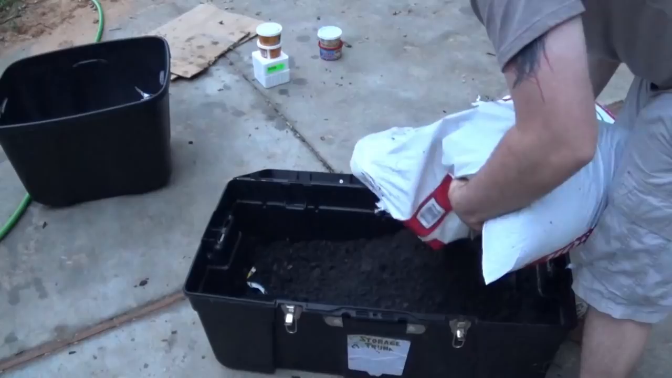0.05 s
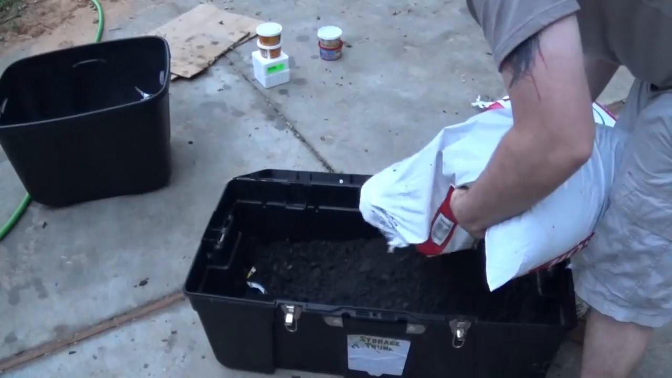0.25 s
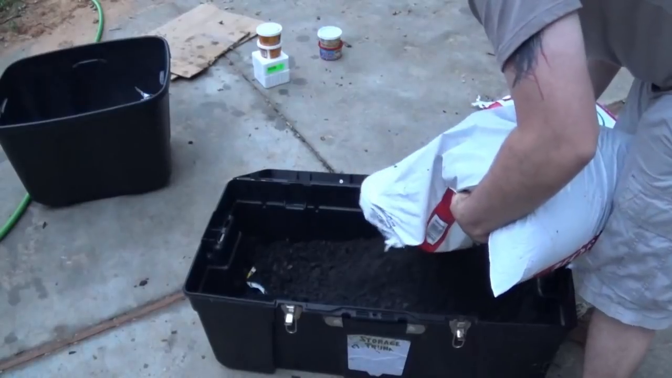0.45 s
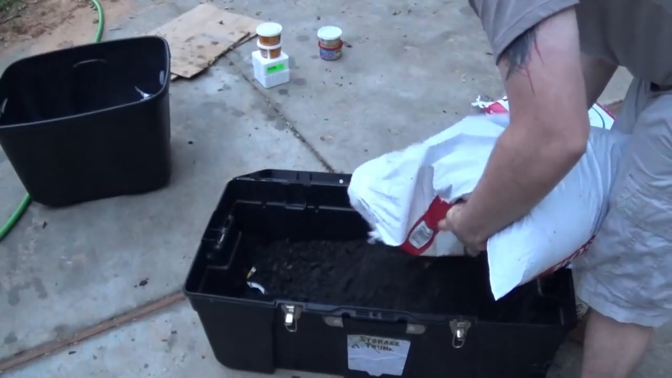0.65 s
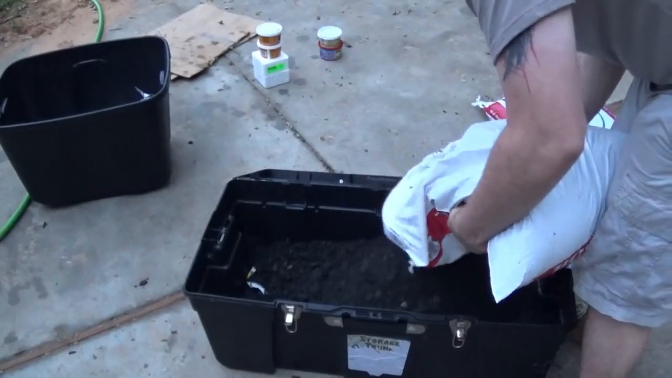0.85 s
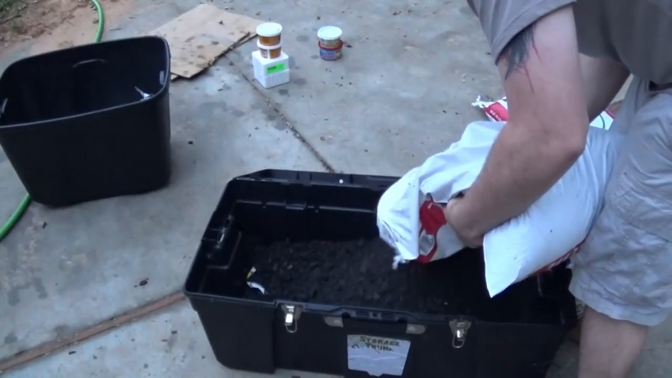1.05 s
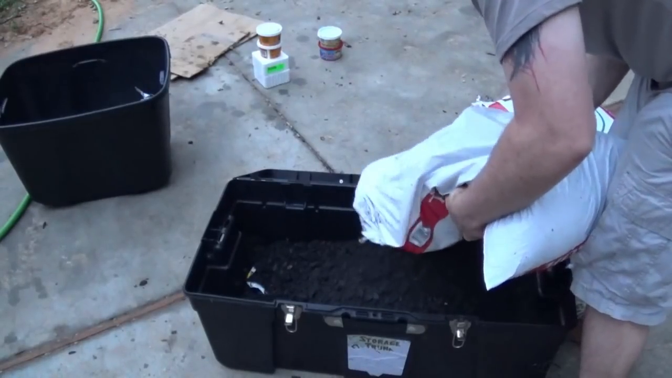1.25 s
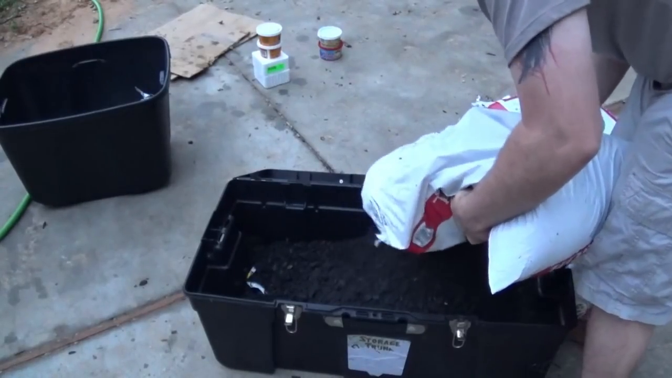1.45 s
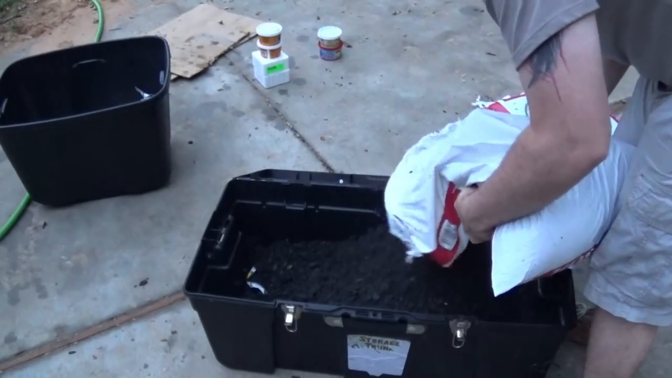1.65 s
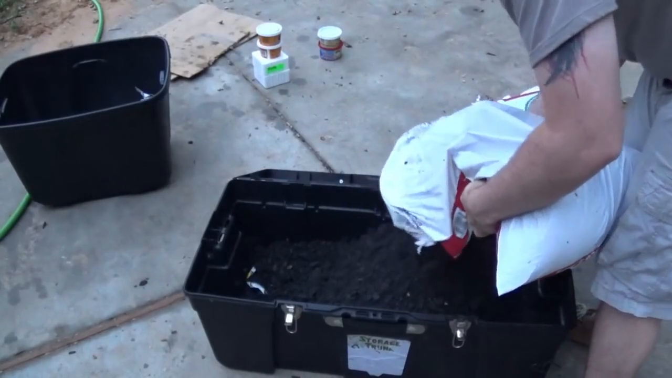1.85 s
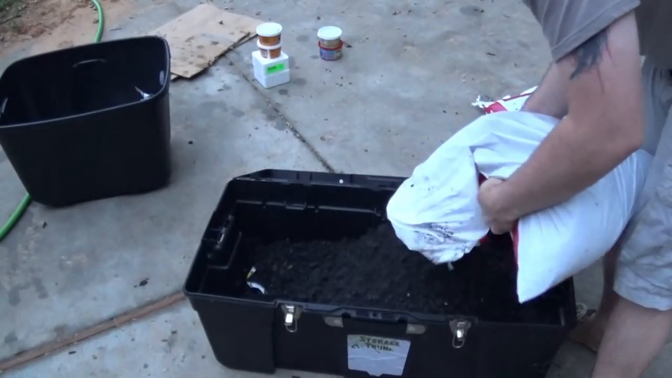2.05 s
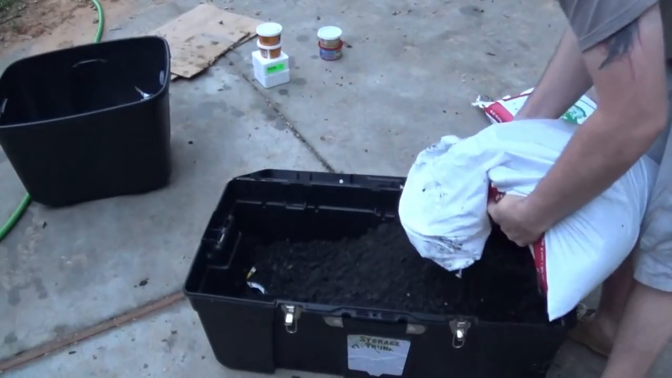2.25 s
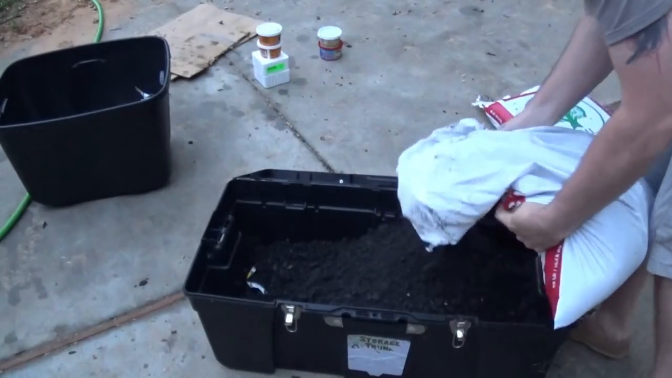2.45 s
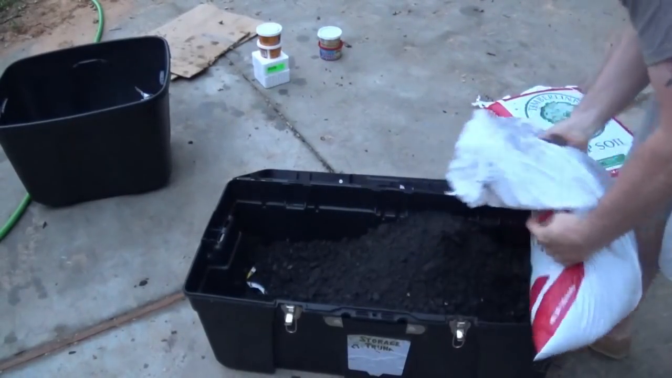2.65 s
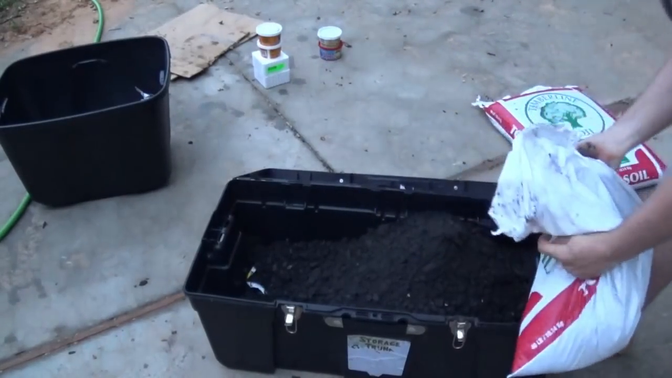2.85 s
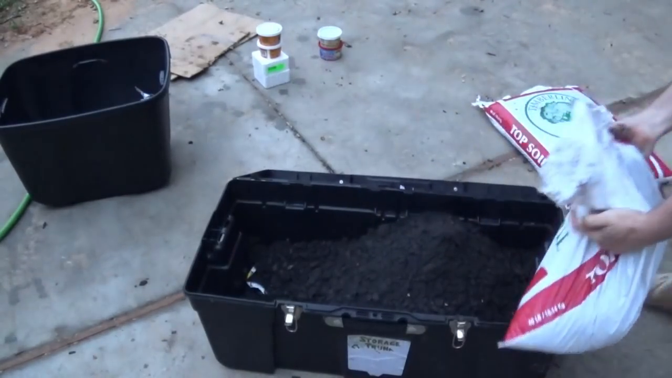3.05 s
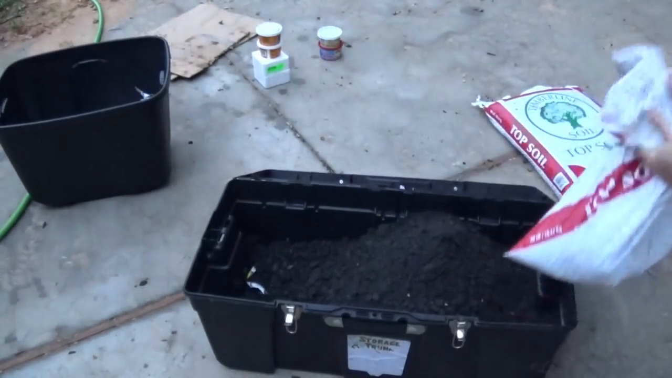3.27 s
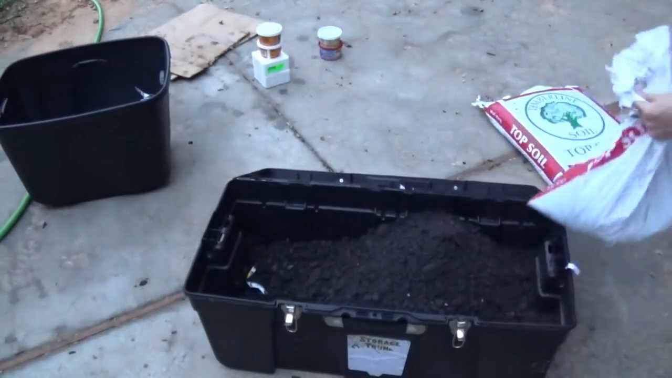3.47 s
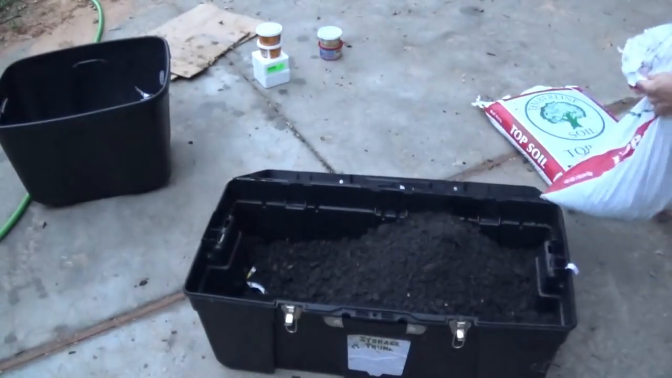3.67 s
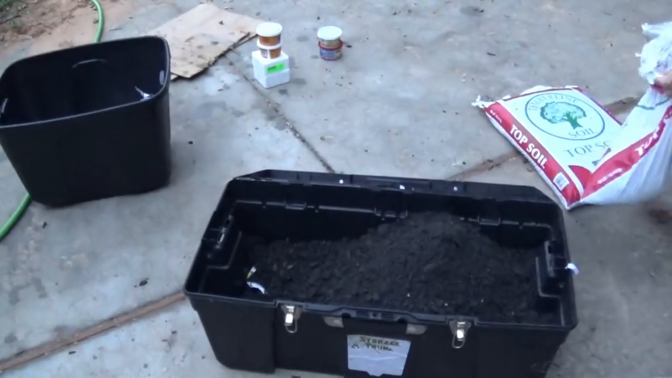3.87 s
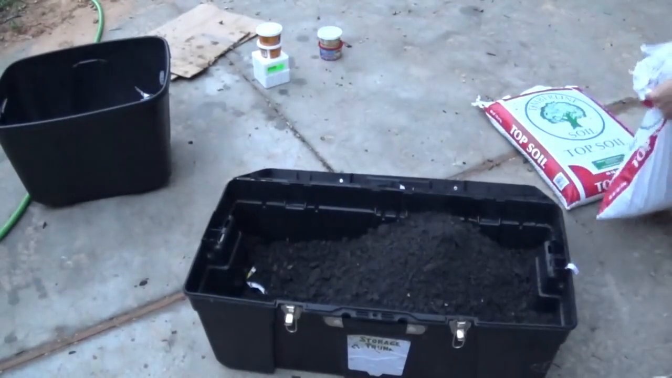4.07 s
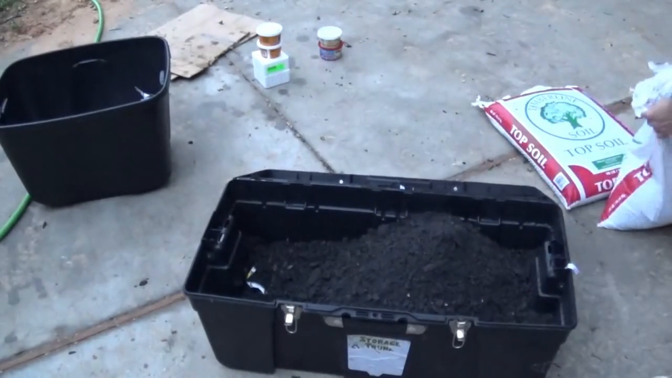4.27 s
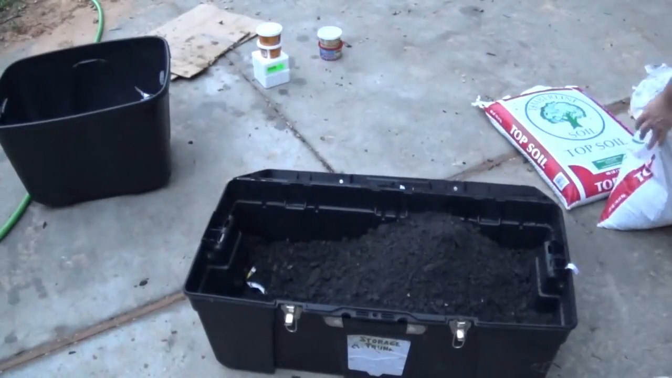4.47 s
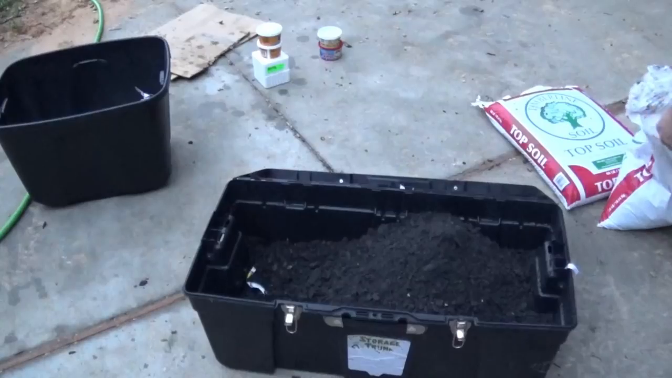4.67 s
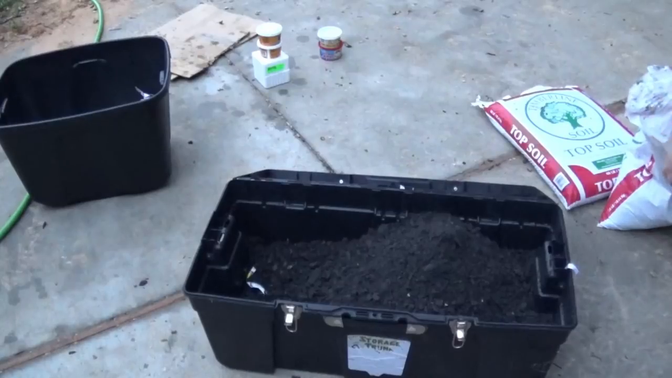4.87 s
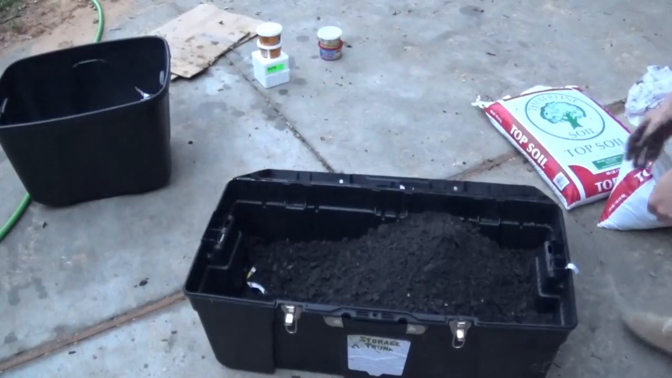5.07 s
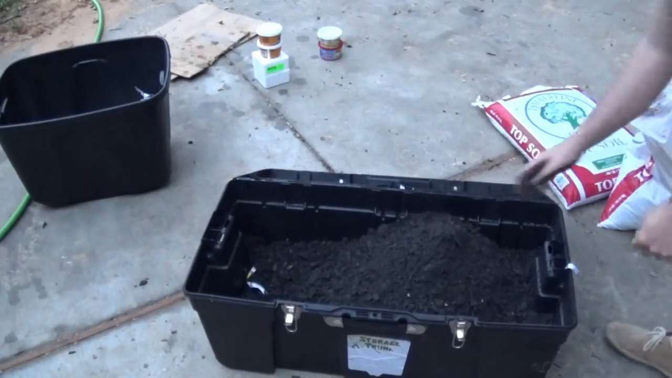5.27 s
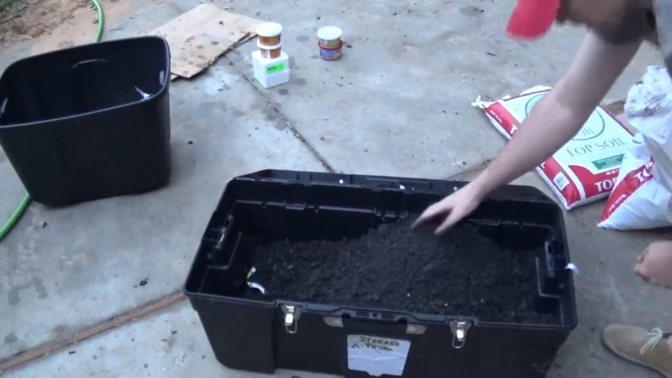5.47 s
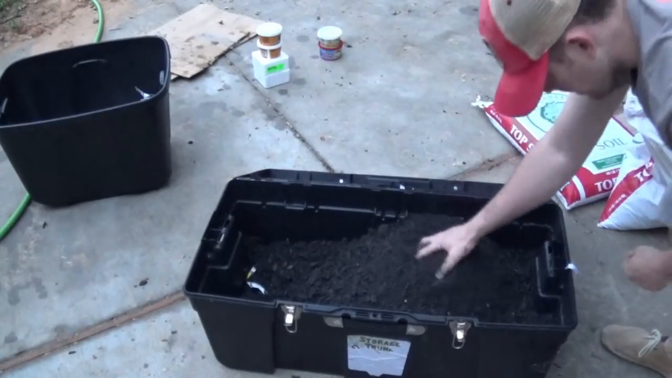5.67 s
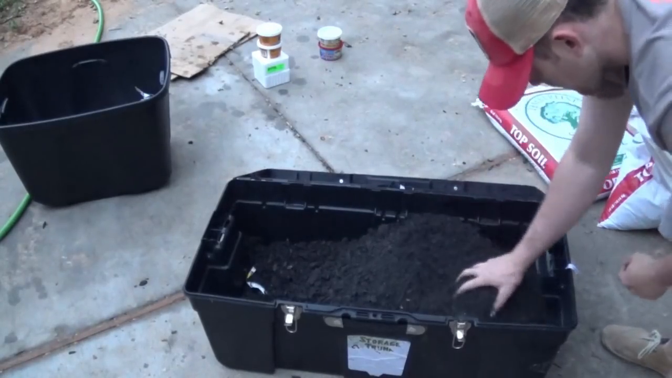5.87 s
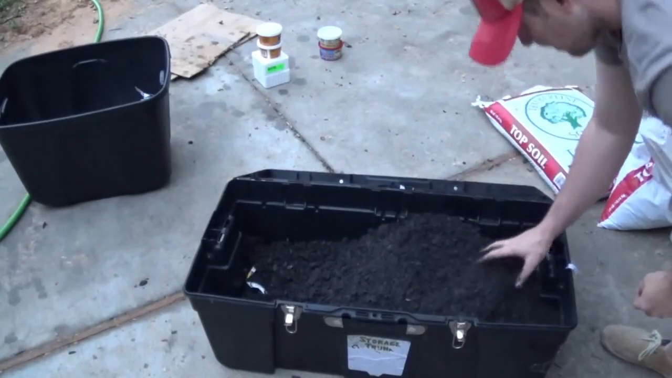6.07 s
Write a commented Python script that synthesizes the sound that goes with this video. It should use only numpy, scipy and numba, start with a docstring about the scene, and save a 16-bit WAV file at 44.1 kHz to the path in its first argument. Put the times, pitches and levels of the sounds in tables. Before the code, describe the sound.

Close, bright stereo sound outdoors: crinkling film and sliding soil, with scattered sharp pops, one early falling bird whistle and a tiny latch rattle. The crackle grows dense and loudest near the middle, drifts slightly right as the sack is carried off, and ends in a few crisp snaps. Near-silence follows, then small gritty strokes over soft air and thin insect tones.

```python
"""Plastic film crackles in tiny creases and louder snaps as a sack of soil is tipped into a plastic chest,
lifted, set down and the soil raked by hand on a concrete yard: struck damped sines, noise and filtered pops.
Soft thuds and a latch clink are damped sines; a bird's one whistle is a falling sine with noise echoes.
Behind it lie smooth far air and insects, made of broad and narrow bands of noise."""
import sys
import numpy as np
from scipy import signal
from scipy.fft import rfft, irfft
from scipy.io import wavfile
from scipy.ndimage import uniform_filter1d
from numba import njit

SR = 44100
rng = np.random.default_rng(int(sys.argv[2]) if len(sys.argv) > 2 else 0)


def to_wav(sig):
    """Store sig (one row per channel, or 1-D mono) as 16-bit WAV at the path in sys.argv[1].

    Samples outside -1..1 are clipped; the rate is SR.
    """
    pcm = np.clip(np.atleast_2d(sig), -1, 1) * 32767
    pcm = np.round(pcm).astype(np.int16)
    wavfile.write(sys.argv[1], SR, pcm.T)  # frames by channels


N = 269892


# Colour of the rustling film: f/Hz, relative level/dB per Hz
FILM_COLOUR = [(18, -60), (30, -43), (227, -12.5), (263, -10.5), (623, -2), (778, -3.5), (1590, -1),
               (2360, -5), (2950, -2.5), (6490, -6), (8520, -1), (9640, -1), (10900, -7), (14200, -57),
               (22000, -120)]


def rustle(gains):
    """Swarms of creases over the hiss of sliding soil and film, as busy as the hands."""
    swarm = undb(2.0) * creases(count=4500, scatter_db=3.0, spread_s=.001, cycles=9.9, wander_db=2.5)
    hiss = wide_noise()
    parts = thirds(colour(swarm + hiss, FILM_COLOUR))
    # the heavy sack shifts air and shakes the ground: a faint rumble
    lowpass = signal.butter(2, 110, fs=SR, output="sos")
    rumble = signal.sosfilt(lowpass, wide_noise(spread=2.5))
    mix = sum(gain * level(part, 0) for gain, part in zip(gains, parts))
    mix = mix + gains[1] * level(rumble, -35.0)
    return mix * sides(place_db(np.arange(N) / SR))


# Underlying rustle of the handled sack and sliding soil, swelling and fading:
# t/s, middle level/dB, dull level/dB re middle, crisp level/dB re middle
UNDERLYING_RUSTLE = [(0, -51, -2.5, -1), (0.3, -56.5, 1, 0.5), (0.63, -53.5, 2, 4), (0.78, -45, -1, 3.5),
                     (0.95, -45, -3, 0.5), (1.08, -51.5, -0.5, 3), (1.5, -52.5, 0, 3.5),
                     (1.97, -55, 5, 3.5), (2.05, -42.5, -0.5, -0.5), (2.4, -49, -3.5, 4),
                     (2.68, -45.5, 1.5, 5.5), (2.85, -44, -6, 1), (3.17, -48.5, -2, 1.5),
                     (3.33, -51, -3, -4), (3.6, -48, 3.5, 2), (3.75, -55.5, 4.5, -6), (4.06, -54, 0.5, 0.5),
                     (4.3, -52, -1.5, 1), (4.56, -55.5, 1, -7), (4.69, -65, -1, -1), (4.9, -57.5, -4, -2),
                     (4.96, -65, 1.5, -2), (5.45, -81, -13, -11), (5.6, -65, 3, 2.5), (5.82, -73, -1, 3),
                     (6.12, -62, -10, -11)]
# Tugs at the sack and strokes through the soil:
# t/s, peak middle level/dB, rise/s, fall/s (each per SWING_DB), dull level/dB re middle, crisp level/dB re middle
TUGS = [(.156, -45, 0.041, .1, 0.5, 1.5), (.314, -49, 0.041, 0.072, 2.5, 3.5),
        (.474, -46.5, 0.082, 0.022, 0, 0.5), (.596, -49, 0.046, 0.024, -15, -5),
        (.67, -53.5, 0.019, .04, 8, -5), (.885, -48, 0.037, 0.039, 6, 1),
        (.99, -47, 0.046, 0.025, -0.5, -1), (1.174, -52, .1, .2, 2.5, 3.5), (1.3, -56, 0.055, .05, 8, -3),
        (1.619, -46, 0.038, 0.092, -0.5, 2), (1.904, -48.5, 0.1, 0.071, -1.5, -7),
        (2.469, -42, 0.17, 0.027, -1.5, -.5), (2.528, -46, 0.035, .07, 4.5, 2),
        (2.621, -42, 0.065, 0.03, 2, 7.5), (2.744, -31.5, 0.064, 0.037, -1.5, 1.5),
        (2.905, -45, .03, 0.065, 2, -4), (3.226, -40.5, 0.03, 0.043, -2.5, 0),
        (3.351, -37.5, 0.076, 0.07, -4, -2.5), (3.456, -38.5, 0.013, 0.22, -4.5, -2.5),
        (3.547, -41, 0.12, 0.054, 1.5, 5), (3.702, -41.5, 0.061, 0.027, -9, 4.5),
        (3.869, -50, 0.16, 0.13, -4, 3.5), (4.022, -58, 0.039, 0.048, -12, -9),
        (4.197, -30, 0.034, 0.038, -1, -2), (4.519, -52, 0.068, 0.06, -15, -1),
        (4.595, -55.5, 0.033, 0.058, -1, -8), (4.932, -52.5, 0.018, 0.0087, 3, -3),
        (5.188, -53, .01, 0.028, 6, 2), (5.246, -47.5, 0.018, 0.063, -4, -3.5),
        (5.347, -48.5, 0.023, 0.025, 4, 5), (5.396, -59, .03, 0.071, -3, -17),
        (5.52, -54, 0.034, 0.035, -1, 0.5), (5.845, -59, 0.015, 0.16, 6.5, 2),
        (5.902, -57, 0.052, 0.1, 7, 5), (6.06, -59, 0.076, 0.1, -19, -13)]
SWING_DB = 10


def handling():
    """Dull, middle and crisp rustle gains: the power of the underlying rustle plus a swell for every tug."""
    t = np.arange(N) / SR
    s, *columns = np.transpose(UNDERLYING_RUSTLE)
    db, dull_db, crisp_db = (np.interp(t, s, c) for c in columns)
    power = undb([db + dull_db, db, db + crisp_db]) ** 2
    for at, peak_db, rise, fall, dull_db, crisp_db in TUGS:
        # follow each swell down to four swings below its peak
        near = slice(max(int((at - 4 * rise) * SR), 0), int((at + 4 * fall) * SR))
        distance = np.maximum((at - t[near]) / rise, (t[near] - at) / fall)
        swell_db = peak_db - SWING_DB * distance
        power[:, near] += undb(swell_db + np.array([[dull_db], [0], [crisp_db]])) ** 2
    return np.sqrt(power)


def creases(count, scatter_db, spread_s, cycles, wander_db):
    """Each tiny crease rings six patches of film, each at its own pitch; big creases are rare."""
    u = rng.random((count, 6, 4))
    delay = -spread_s * SR * np.log(1 - u[:, :, 1])
    start = u[:, :1, 0] * N + delay
    hz = 150 + 11500 * u[:, :, 2]
    size = undb(-scatter_db * np.log(1 - .99 * u[:, :1, 3]))  # one size for all patches of a crease
    strike = size * np.sign(u[:, :, 3] - .5) * np.sqrt(hz / 4000 + 0.07)
    pan_db = wander_db * rng.standard_normal(hz.shape)
    gain = (strike * sides(pan_db)).reshape(2, -1)
    t60 = (cycles / hz).ravel()
    return level(ring(start.ravel().astype(np.int64), hz.ravel(), t60, gain, N), 0)


# Loud snaps of the film:
# t/s, peak level/dB, dull part gain/dB, fold f/Hz, crisp part gain/dB
SNAPS = [(0.314, -15.5, -14, 2080, -1), (0.5809, -24.5, -6, 820, -3), (0.753, -28, -17.5, 760, 19),
         (0.801, -19, -3, 2200, 23), (0.8045, -20, -3, 2000, 20), (1.168, -13.5, 15, 1300, 22),
         (1.6217, -26.5, -0.5, 2050, -4.5), (1.846, -21, -8, 1130, -27), (1.8673, -19.5, -8, 1840, 23),
         (1.8946, -16.5, 3, 2080, 5), (1.923, -11.5, -14, 1850, -6), (2.0087, -16, -1, 1430, -0.5),
         (2.0842, -14, -3, 1800, 13), (2.101, -16, 2, 1930, 8), (2.1579, -13, -8, 2200, 10),
         (2.1749, -13.5, 8, 950, 8), (2.2839, -14, 4.5, 1030, 5), (2.4017, -15.5, -4, 580, 14),
         (2.4354, -9, 7.5, 1150, 2.5), (2.4757, -15, 6, 1120, -5), (2.5182, -12.5, -6, 1370, -5),
         (2.555, -12, 1, 1650, 11), (2.597, -13.5, 11, 1120, 5), (2.623, -13, -10, 2020, 5),
         (2.6313, -11.5, 8, 1500, -3), (2.7407, -2.5, -0.5, 1960, 2), (2.75, 1.5, -3, 636, 5),
         (2.7925, -11, -7, 1740, 11), (2.8235, -14, -1, 1650, 8), (2.886, -19, 0, 1770, -6),
         (2.909, -21, 8, 1500, -8), (2.978, -20.5, 4, 1540, -5), (3.1022, -16.5, 10, 1110, 11.5),
         (3.1686, -20.5, 9, 600, 10), (3.2142, -10, -8, 870, 5), (3.233, -8, -9, 1080, 8),
         (3.314, -11, 7, 1660, 10.5), (3.3372, -25.5, 11, 1420, -9), (3.352, -18, 8, 1300, -13),
         (3.3818, -14.5, -2, 564, -3), (3.4076, -10.5, -11, 2200, 0), (3.4182, -7.5, -6, 1670, 0),
         (3.446, -14, -13, 1640, -4), (3.6108, -15, -4, 1720, -4), (3.6491, -8.5, -6, 1530, 4),
         (3.7042, -13, 10, 1010, 12), (3.7298, -12, -7, 1550, 14), (3.7684, -19, 5, 1130, 11),
         (3.8168, -13.5, 4, 567, 6), (3.8534, -23, -23.5, 660, 21), (3.9215, -18.5, -9, 1490, 4),
         (4.0138, -19, -6, 1650, 9), (4.0312, -24, 1, 1780, -14), (4.1917, -6, 1, 765, 5),
         (4.226, -16, -2, 2020, 12), (4.271, -20, -13, 1060, -5), (4.5066, -8.5, -6, 1420, -2.5),
         (4.551, -24, -3, 1110, -17), (4.584, -27.5, 2, 1080, 0), (4.5933, -22.5, 7, 1550, -5),
         (4.793, -35, -6, 1700, -4), (4.8108, -33, -2, 1660, -6), (4.8356, -23, 0.5, 1370, -8),
         (4.8547, -31, 2, 1160, 4), (4.9032, -29.5, 2, 2000, -9), (4.92, -29, 8.5, 1160, -5),
         (4.9925, -25, -14, 1960, 8), (5.2464, -24.5, 6.5, 1220, -20), (5.3073, -26, -16, 2200, -3),
         (5.3875, -18.5, -2, 2370, -9), (5.6323, -31.5, -8, 2090, 16), (5.8336, -30, -4, 1830, -10),
         (5.857, -34, 15, 1830, -14), (5.867, -27.5, 27, 594, 18), (5.9016, -28.5, 6, 650, -19),
         (5.9174, -31, 24, 650, 12), (5.9589, -18, -1, 1570, -5), (6.011, -27, -13, 1990, -9),
         (6.0291, -23, -3, 2000, -13), (6.0474, -23.5, -4, 1770, -16), (6.063, -25.5, -1, 1940, -17),
         (6.0707, -27.5, 6, 2060, 2), (6.102, -33, 1, 1920, -17)]


def snaps(rows, echo_s=0.001311, low_hz=500, high_hz=11000, sharpness=2.24):
    """A pop, its bounce off the concrete and a short film shiver; the fold rings dully at its own pitch."""
    lead, t = 64, np.arange(1000) / SR  # the lead, in samples, leaves room for the two-way filters
    echo, tail_db, tail_t60 = .55, -18, .016
    out = np.zeros((2, N + lead + len(t)))
    band = signal.butter(2, (low_hz, high_hz), "band", fs=SR, output="sos")
    for s, peak_db, dull_db, fold_hz, crisp_db in rows:
        mid, side = rng.standard_normal((2, len(t)))
        shiver = mid + 0.26 * side * np.array([[1], [-1]])
        pop = undb(tail_db) * shiver * undb(-60 * t / tail_t60)
        pop[:, 0] += 1
        pop[:, int(echo_s * SR * rng.uniform(.7, 1.3))] += echo
        pop = np.pad(signal.sosfilt(band, pop), ((0, 0), (lead, 0)))
        dull, middle, crisp = thirds(pop)
        fold = signal.lfilter(*signal.iirpeak(fold_hz, sharpness, SR), dull)
        fold *= np.linalg.norm(dull) / np.linalg.norm(fold)
        pop = undb(dull_db) * fold + middle + undb(crisp_db) * crisp
        pop *= undb(peak_db) / np.abs(pop).max()
        pan_db = place_db(s) + 2 * rng.standard_normal()  # each snap wanders by 2 dB
        i = int(s * SR)
        out[:, i:i + lead + len(t)] += pop * sides(pan_db)[:, None]
    return out[:, lead:N + lead]


def small_snaps(gain, count):
    """Rows like SNAPS, at chance moments, standing out above the rustle and rising and falling with it."""
    above_rustle_db, scatter_db, colour_spread_db = 18.5, 2.5, 6.5
    u, g = rng.random((count, 2)), rng.standard_normal((count, 3))
    at = u[:, 0] * N
    rustle_db = 20 * np.log10(gain[at.astype(int)])
    peak_db = rustle_db + above_rustle_db + scatter_db * g[:, 0]
    dull_db, crisp_db = colour_spread_db * g[:, 1], colour_spread_db * g[:, 2]
    fold_hz = 600 + 1600 * u[:, 1]
    return np.transpose([at / SR, peak_db, dull_db, fold_hz, crisp_db])


# The sack is carried off to the right: t/s, left minus right level/dB
PLACE = [(0, -0.5), (2, -0.5), (3.2, -2.5), (6.12, -2)]


def place_db(s):
    """Left-right level difference that places the sack at a given time."""
    return np.interp(s, *np.transpose(PLACE))


# Clods and the sack landing: t/s, strike level/dB before the softening low-pass, f/Hz
THUDS = [(0.664, -47, 180), (0.859, -61, 285), (1.256, -55, 204), (2.387, -44, 251), (2.684, -57, 236),
         (2.734, -59, 199), (3.028, -51, 299), (3.09, -48, 263), (3.478, -28.5, 463), (3.598, -38, 221),
         (4.181, -43, 198), (4.187, -50.5, 96), (5.884, -48, 272)]


def thuds(cycles=14.0, soft_hz=500):
    """Soft blows on chest and ground: damped low cycles, rounded by the slow contact."""
    s, db, hz = np.transpose(THUDS)
    blows = ring((s * SR).astype(np.int64), hz, cycles / hz, undb([db, db]), N)
    return signal.sosfilt(signal.butter(2, soft_hz, fs=SR, output="sos"), blows)


# Blows on the latch of the chest: t/s, level/dB
CLINKS = [(.966, -42), (.975, -39), (.983, -36.5)]
# Ringing modes of the latch: f/Hz, level/dB re blow, t60/s
LATCH_MODES = [(2062, -1, 0.35), (2966, 1.5, 0.19), (3120, -7, .08), (3230, -5, 0.13), (3817, -20, .2),
               (4440, -11, 0.28)]


def latch():
    """The metal latch rattles: every blow rings all its modes as damped sines."""
    hz, db, t60 = np.tile(np.transpose(LATCH_MODES), len(CLINKS))
    s, blow_db = np.repeat(np.transpose(CLINKS), len(LATCH_MODES), axis=1)
    return ring((s * SR).astype(np.int64), hz, t60, undb([db + blow_db] * 2), N)


def bird(echo_db=2.0, echo_t60=.3, waver=.022):
    """A slightly hoarse whistle, sliding down ever more slowly, with echoes from walls and trees."""
    start_s, start_db, fade_db_per_s = .135, -47.5, 9
    high_hz, low_hz, slide_s = 8110, 3593, .38
    attack_s, hold_s, release_s = 0.02, .28, 0.094
    t = np.arange(N) / SR
    age = np.maximum(t - start_s, 0)
    hz = low_hz + (high_hz - low_hz) * np.maximum(1 - age / slide_s, 0) ** 2
    envelope = np.interp(age, np.cumsum([0, attack_s, hold_s, release_s]), [0, 1, 1, 0])
    loudness = envelope * undb(start_db - fade_db_per_s * age)
    shake = level(uniform_filter1d(rng.standard_normal(N), 150), 0)  # makes the pitch hoarse
    phase = 2 * np.pi * np.cumsum(hz * (1 + waver * shake)) / SR
    tone = np.sqrt(2) * loudness * np.sin(phase)
    echoes = rng.standard_normal((2, SR // 3)) * undb(-60 * t[:SR // 3] / echo_t60)
    echoes *= undb(echo_db) / np.sqrt(np.sum(echoes[0] ** 2))
    return tone + signal.fftconvolve(tone[None], echoes, axes=1)[:, :N]


# Colour of the far air: f/Hz, relative level/dB per Hz
AIR_COLOUR = [(30, -22), (100, -4), (350, -1.5), (1000, -7), (2500, -5.5), (4500, -12), (6500, -19.5),
              (8000, 1), (11000, -21)]
# Insect bands: f/Hz, width/Hz, level/dB before the swell
INSECTS = [(3220, 65, -85), (5270, 36, -78), (5730, 150, -67.5), (7740, 80, -70.5)]


def yard():
    """Smooth far air as coloured noise, and an insect chorus as narrow noise bands."""
    out = level(colour(wide_noise(spread=4.8), AIR_COLOUR), -63)
    for hz, width, db in INSECTS:
        band = signal.butter(2, (hz - width / 2, hz + width / 2), "band", fs=SR, output="sos")
        swell = level(uniform_filter1d(rng.standard_normal(N), SR // 4), 0)  # each band swells on its own
        chorus = level(signal.sosfilt(band, wide_noise(spread=2.8)), db)
        out = out + undb(2.4 * swell) * chorus
    return out


# Likeness of the two channels: f/Hz, correlation before the spread exponent
LIKENESS = [(30, 0.74), (100, 1), (1000, 0.61), (3000, 0.61), (10000, 0.91)]


def wide_noise(spread=0.77):
    """White noise in two channels from mid and side; a larger spread makes them less alike."""
    c = np.clip(along(LIKENESS, np.arange(N // 2 + 1) * SR / N) ** spread, 0, 1)
    mid, side = rfft(rng.standard_normal((2, N)))
    return irfft(mid * np.sqrt(1 + c) + side * np.sqrt(1 - c) * np.array([[1], [-1]]), N)


@njit
def ring(start, hz, t60, gain, length):
    """Damped sines, each struck once at a start sample and dying by 60 dB in t60 seconds."""
    out = np.zeros((2, length))
    for k in range(len(start)):
        # one turn and decay per sample
        p = np.exp(2j * np.pi * hz[k] / SR - np.log(1000) / (t60[k] * SR))
        z = 1 + 0j
        for i in range(start[k], min(start[k] + int(t60[k] * SR) + 1, length)):
            out[0, i] += gain[0, k] * z.real
            out[1, i] += gain[1, k] * z.real
            z *= p
    return out


def thirds(x):
    """Split into dull, middle and crisp parts that add up to the whole."""
    dull_hz, crisp_hz = 2200, 6000
    dull = signal.sosfiltfilt(signal.butter(3, dull_hz, "low", fs=SR, output="sos"), x)
    crisp = signal.sosfiltfilt(signal.butter(3, crisp_hz, "high", fs=SR, output="sos"), x)
    return dull, x - dull - crisp, crisp


def colour(x, table):
    """Filter a sound by a table of f/Hz, level/dB."""
    hz = np.arange(N // 2 + 1) * SR / N
    return irfft(rfft(x) * undb(along(table, hz)), N)


def along(table, hz):
    """Read a table of f/Hz, value on a log frequency axis."""
    f, v = np.transpose(table)
    return np.interp(np.log(hz + 1), np.log(f), v)


def sides(pan_db):
    """Left and right gains from a left minus right level in dB."""
    return undb(np.array([pan_db, -pan_db]) / 2)


def level(x, db):
    """Scale to an rms level in dB."""
    return x * undb(db) / np.sqrt(np.mean(x ** 2))


def undb(db):
    """Decibels to gain."""
    return 10 ** (np.asarray(db) / 20)


def scene():
    """Film and soil in front, then thuds, latch and bird, with the yard behind."""
    gains = handling()
    film = rustle(gains) + snaps(SNAPS) + snaps(small_snaps(gains[1], count=60))
    return film + thuds() + latch() + bird() + yard()


# Colour difference of the microphone pair: f/Hz, left minus right level/dB
PORTS = [(30, -0.5), (400, 1.5), (2000, 0), (10000, -1)]


def record(dry):
    """The two microphone ports differ a little in colour; a steep low-pass cuts the top."""
    balance_db = along(PORTS, np.arange(N // 2 + 1) * SR / N)
    ports = irfft(rfft(dry) * sides(balance_db), N)
    top_hz = 11100
    return signal.sosfilt(signal.ellip(10, .3, 40, top_hz, fs=SR, output="sos"), ports)


dry = scene()
out = record(dry)
to_wav(out)
```